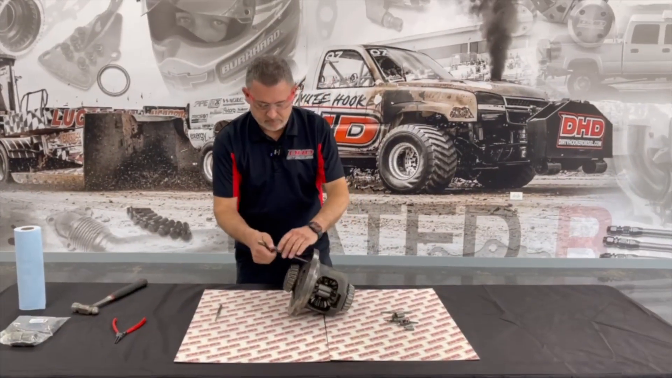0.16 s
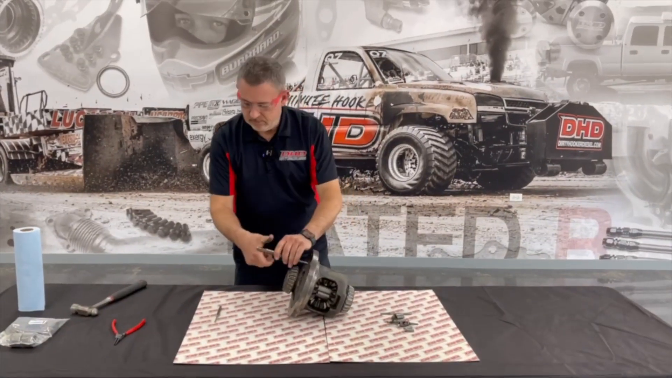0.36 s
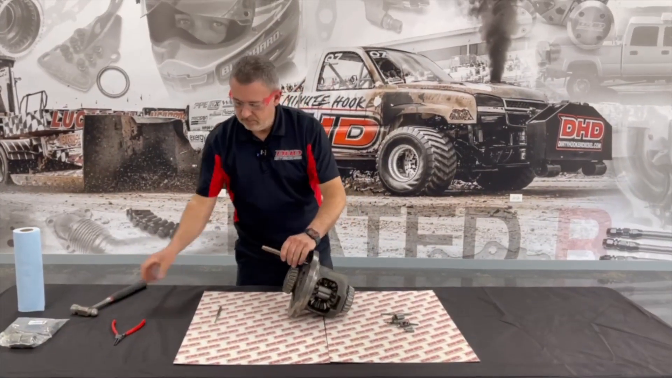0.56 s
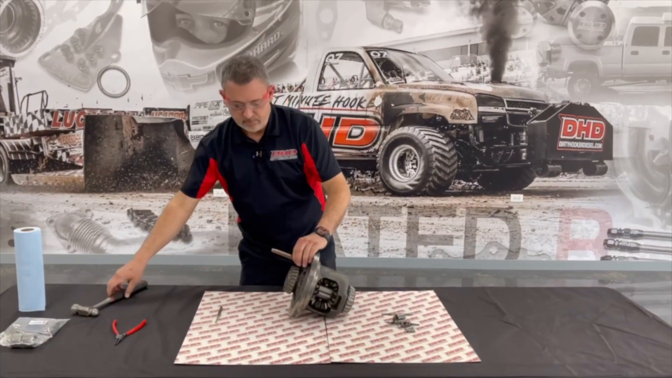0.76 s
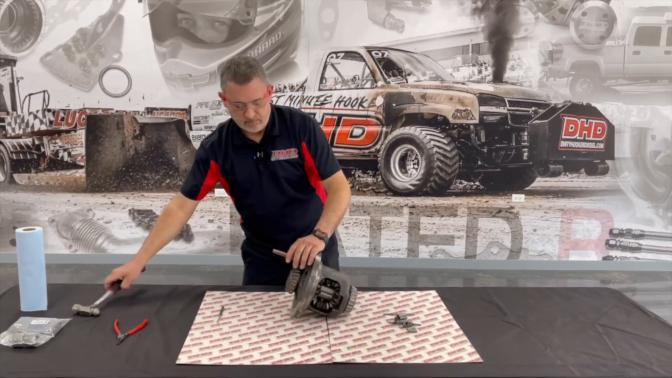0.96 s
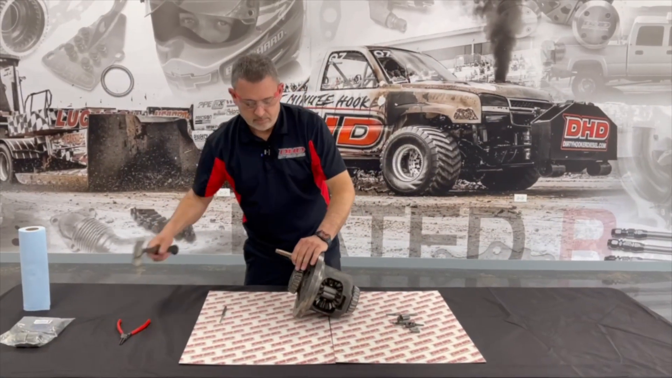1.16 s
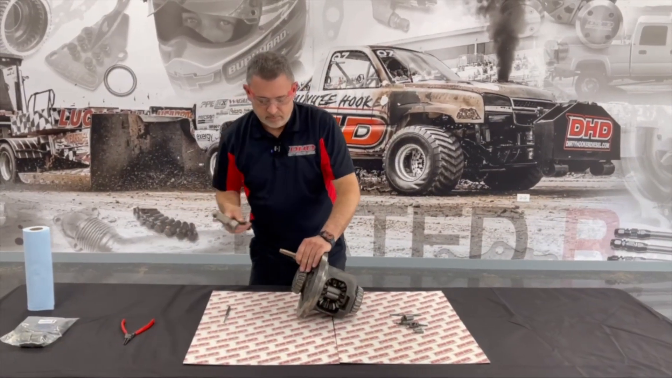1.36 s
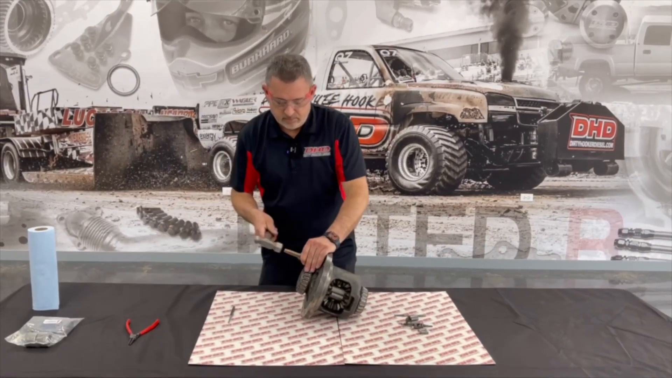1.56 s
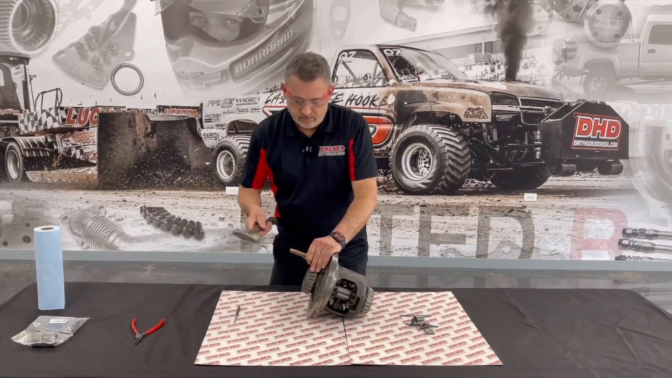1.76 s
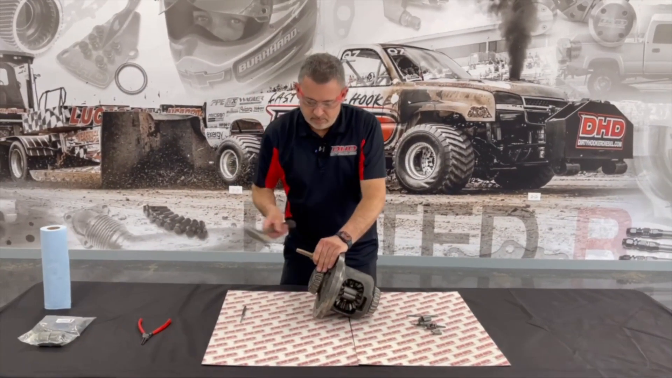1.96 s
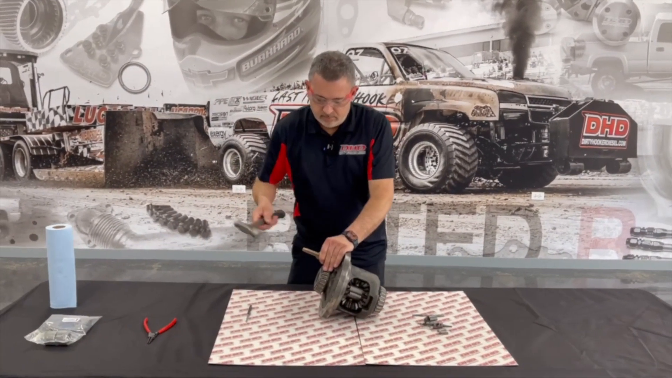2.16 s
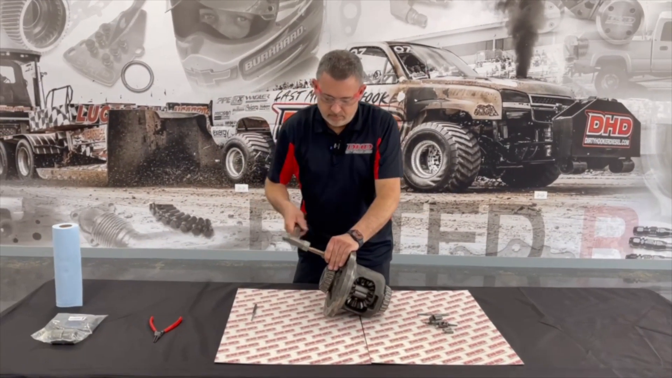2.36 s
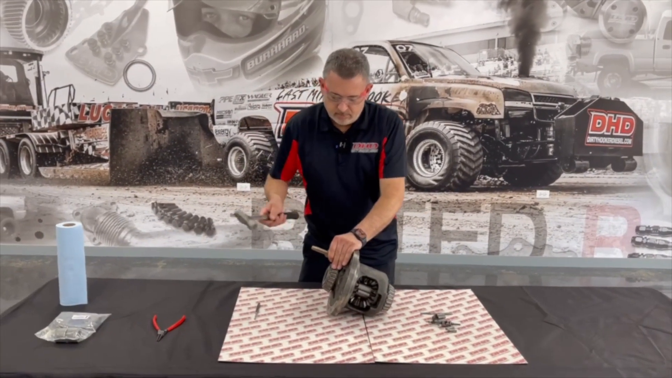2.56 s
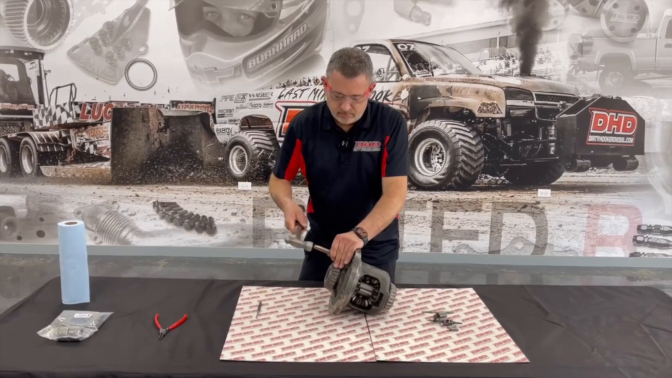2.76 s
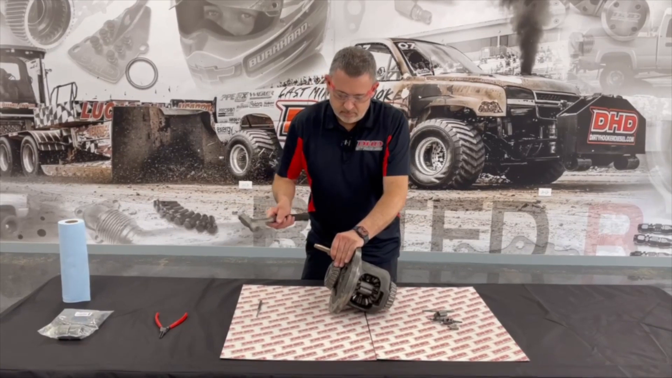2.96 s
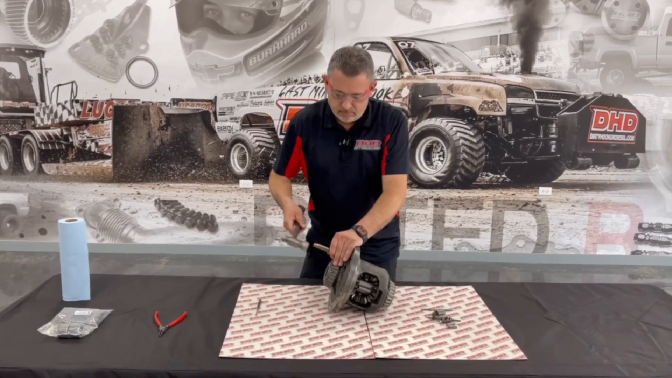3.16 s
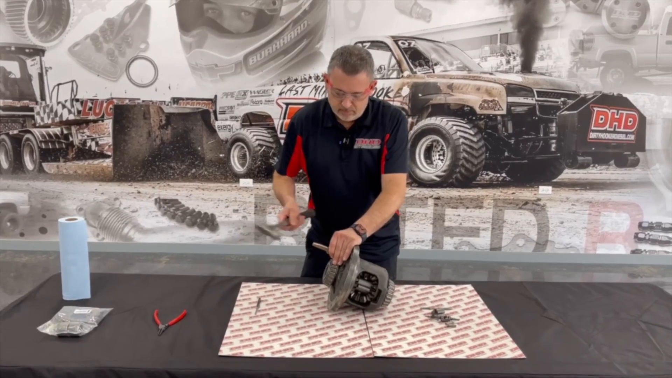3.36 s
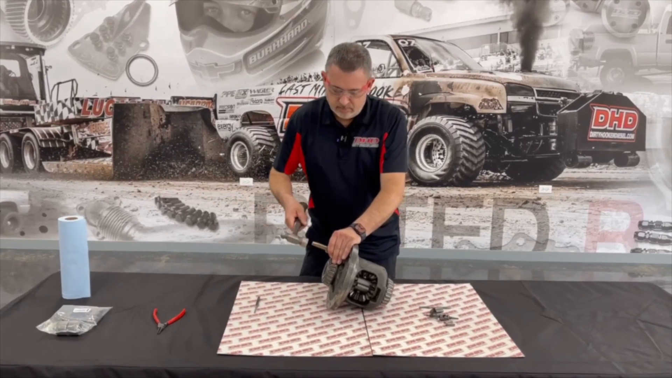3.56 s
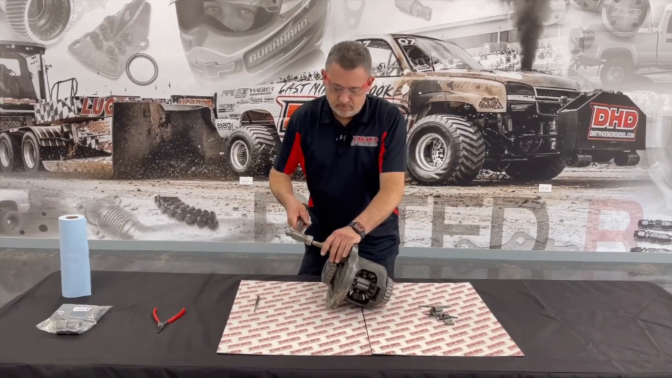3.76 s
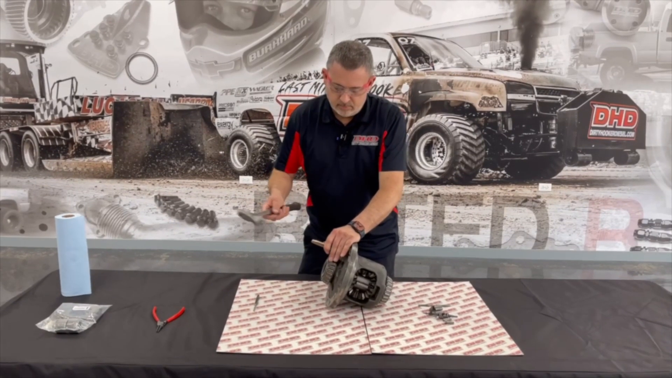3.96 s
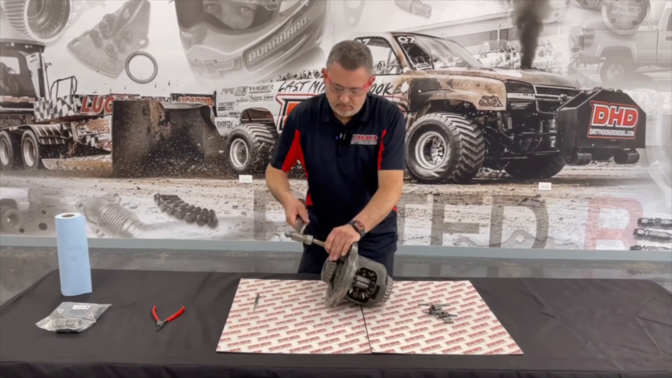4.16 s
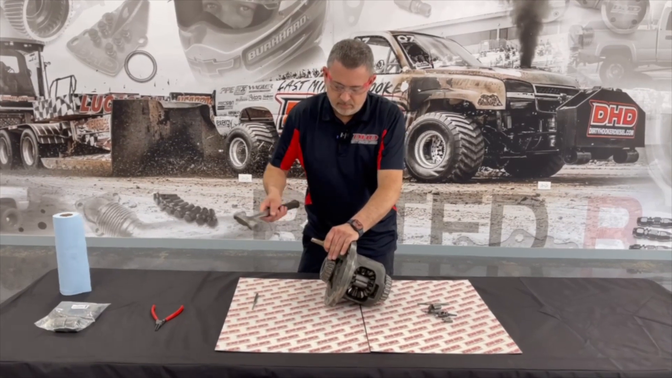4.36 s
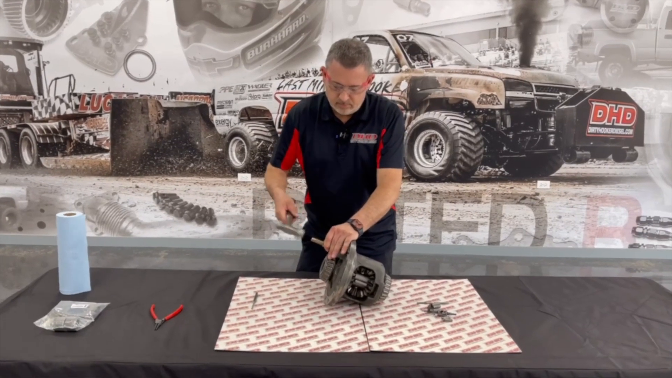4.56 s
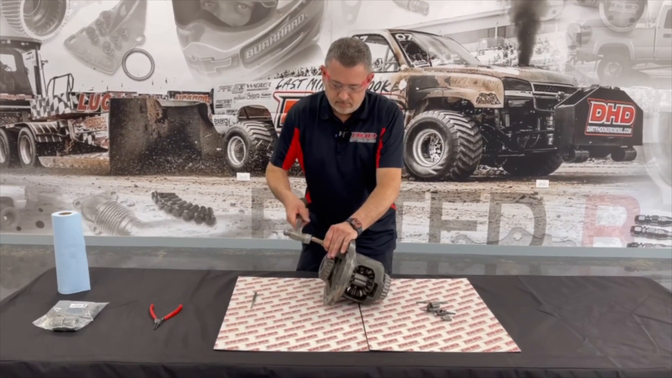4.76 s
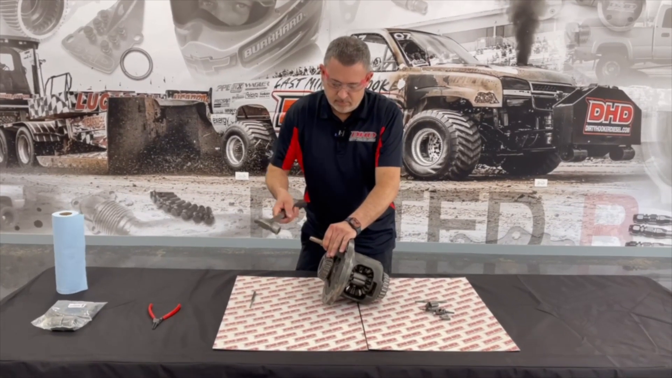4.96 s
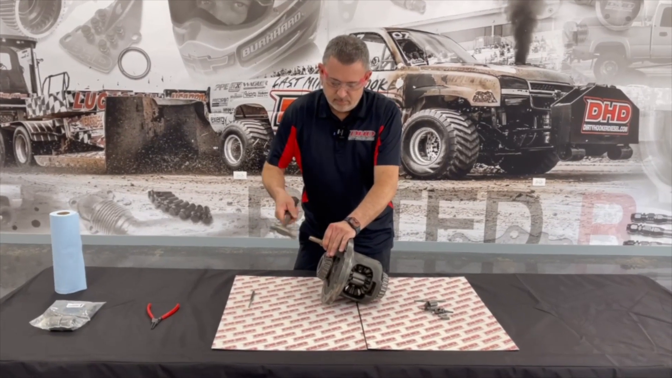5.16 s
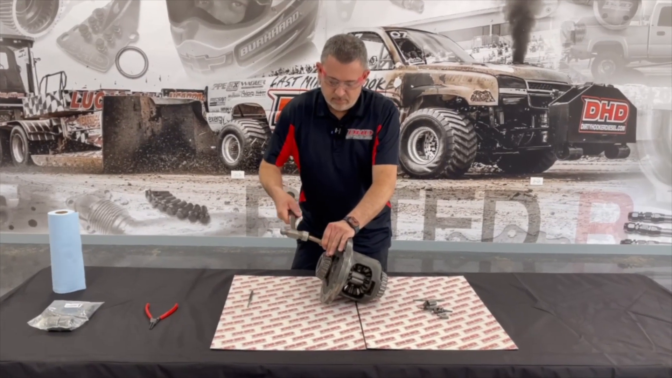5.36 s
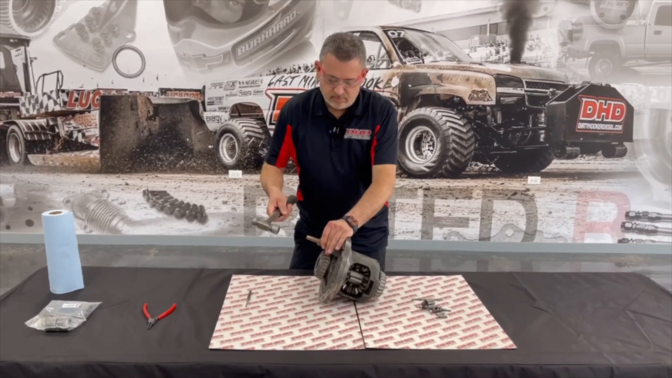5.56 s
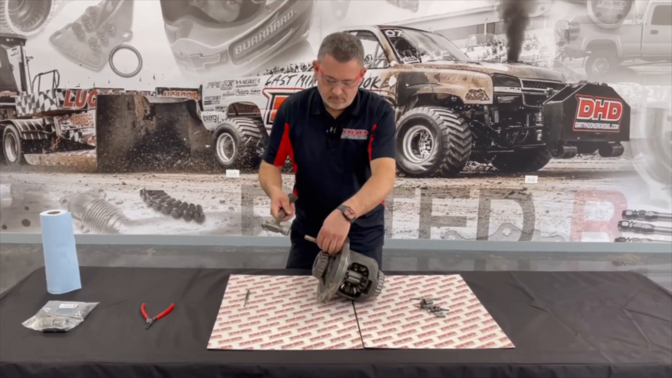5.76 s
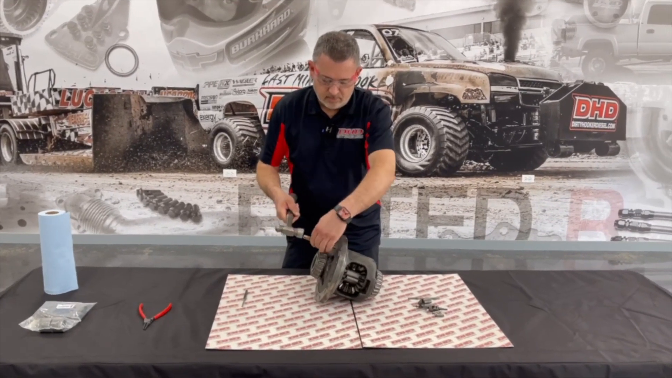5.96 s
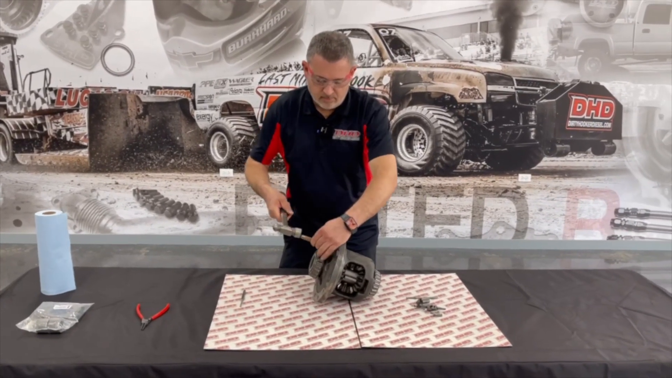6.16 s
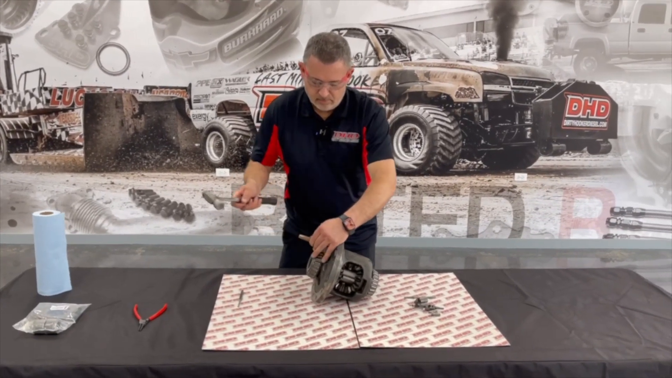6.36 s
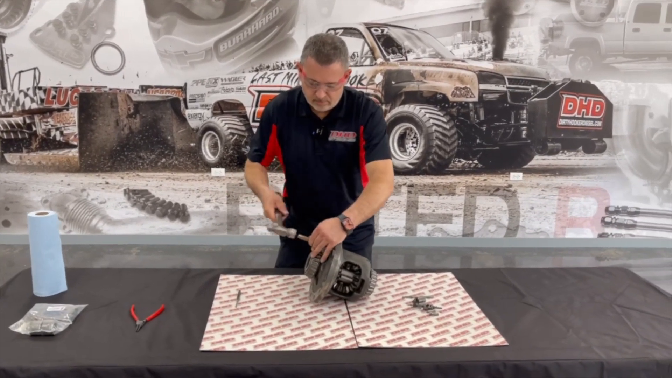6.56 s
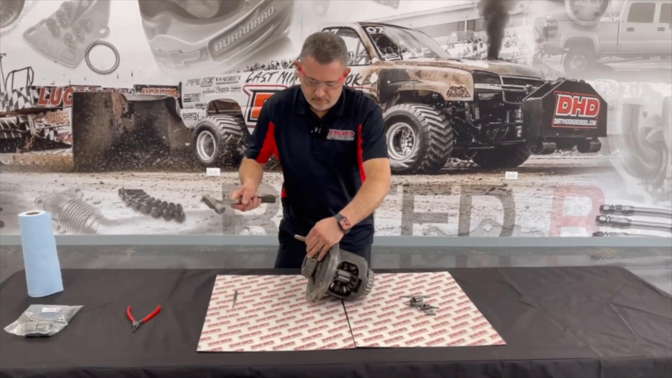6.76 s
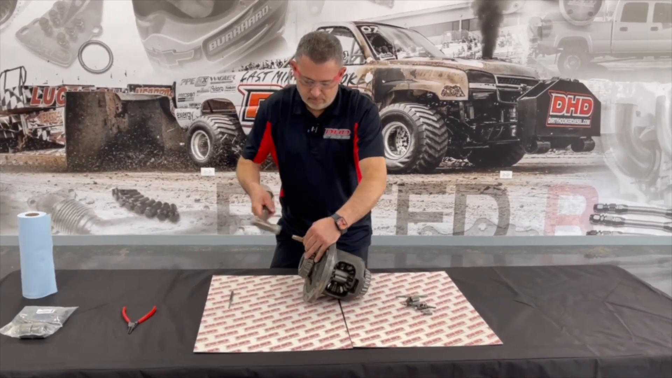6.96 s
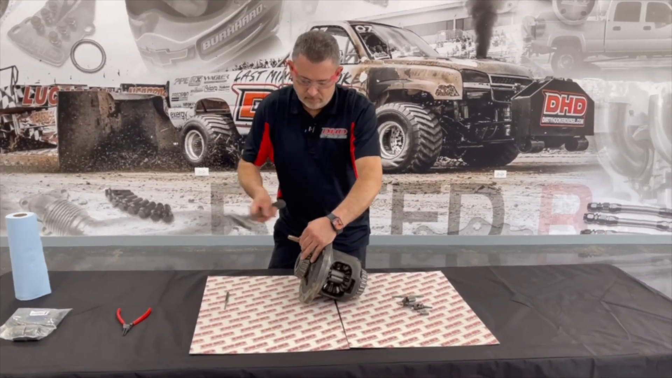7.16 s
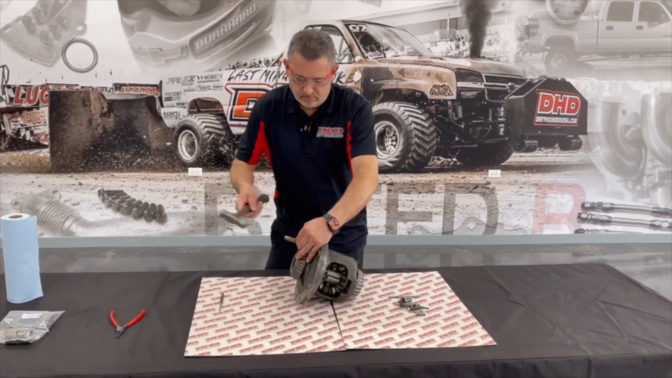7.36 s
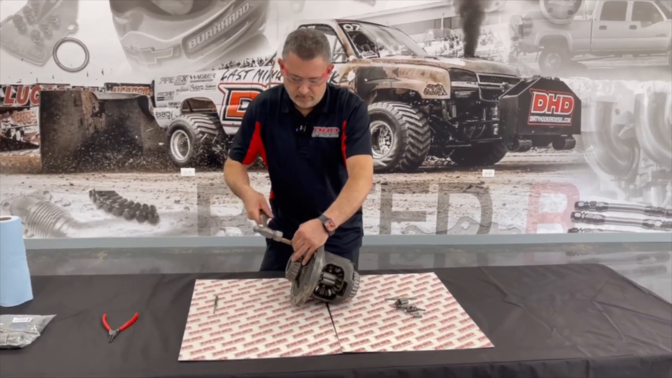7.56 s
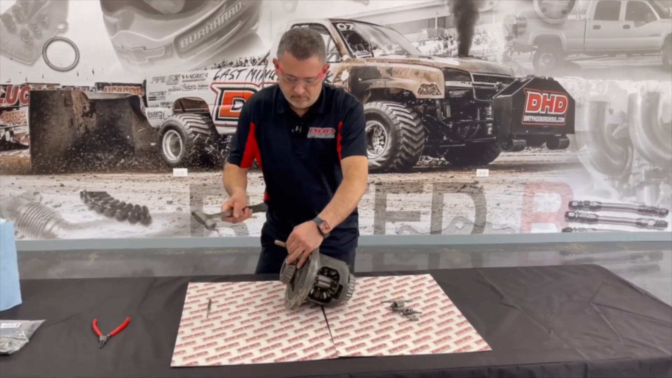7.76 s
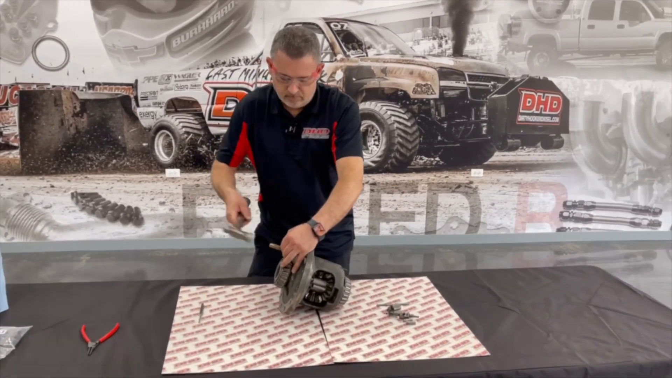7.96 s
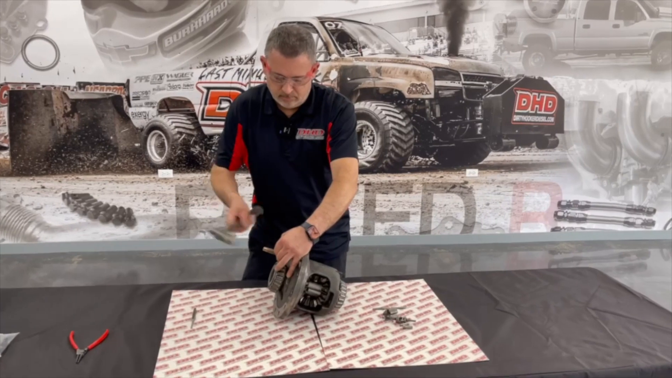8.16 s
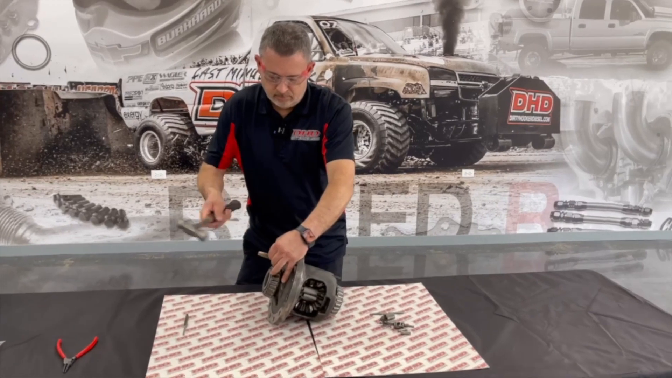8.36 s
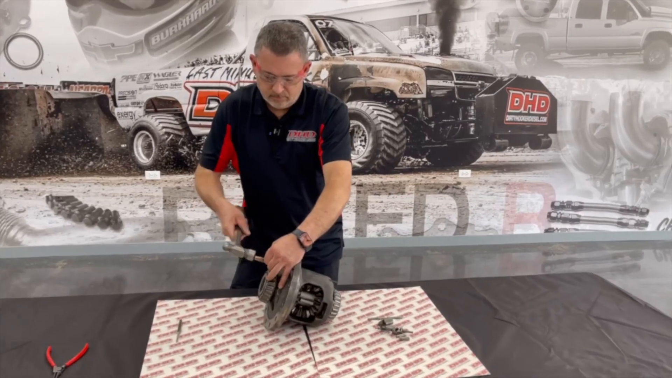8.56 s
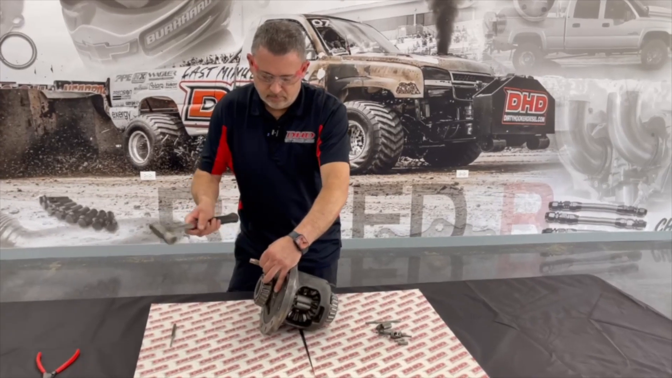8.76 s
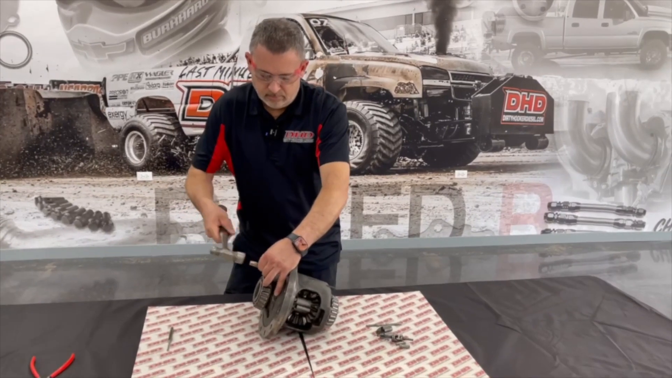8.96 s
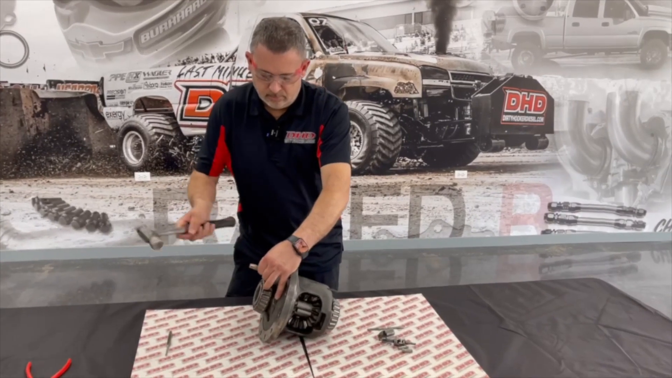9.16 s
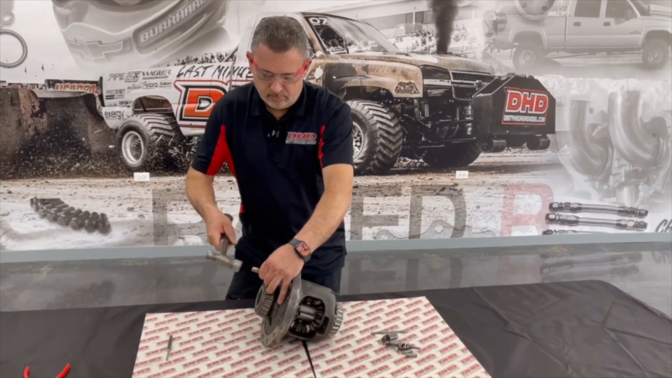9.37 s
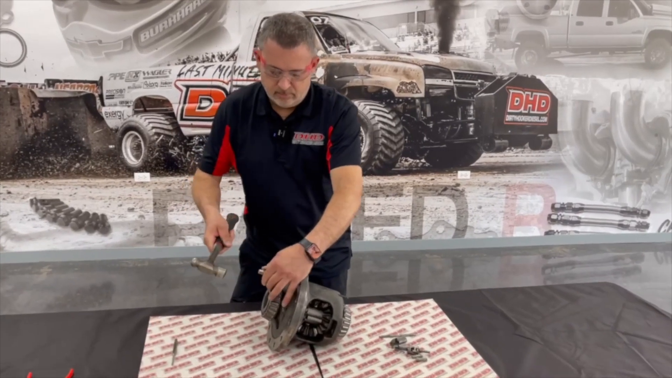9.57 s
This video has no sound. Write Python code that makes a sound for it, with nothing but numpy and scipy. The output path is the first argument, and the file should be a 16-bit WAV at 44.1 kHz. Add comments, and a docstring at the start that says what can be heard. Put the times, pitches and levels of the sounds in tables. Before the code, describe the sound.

Faint gritty scrapes and a light metallic tick open the scene, followed by dull thumps and a cloth rustle. A hammer then drives a punch into a heavy cast housing: one softer tap, then hard, bright cracks in regular runs, with brief gaps filled by tiny clinks and the room's decay. The last blow is strongest. Workshop reverberation, low quiet air, a moderately distant microphone.

```python
"""A hammer drives a steel punch into a heavy cast housing on a padded bench, in three runs of blows.
Each blow layers a chattering crack, dying steel modes and dense noise rattle over the modal boom of the bench.
Around the blows the punch scrapes (resonant grit) and clinks (ticks and modes) in its hole; the hammer
leaves the bench with dull noise thumps and sleeves rustle as filtered noise.
A hard-walled shop answers with a spread-out echo and a diffuse tail, over quiet air."""
import sys
import numpy as np
from scipy import signal
from scipy.fft import rfft, irfft, next_fast_len
from scipy.io import wavfile

SR = 44100
rng = np.random.default_rng(int(sys.argv[2]) if len(sys.argv) > 2 else 0)


def digitize_waveform(pressure):
    """Quantize a signal to 16-bit integers and store it at the path in sys.argv[1].

    Rows of a 2-D input are taken as channels; values are limited to [-1, 1].
    """
    field = np.atleast_2d(pressure).T
    bounded = np.clip(field, -1, 1)
    quanta = np.round(bounded * 32767).astype(np.int16)
    wavfile.write(sys.argv[1], SR, quanta)


def gain_from_db(level_db):
    """Turn a decibel level (scalar or array-like) into a linear amplitude factor."""
    decades = np.asarray(level_db, float) / 20
    return 10 ** decades


N = 424706  # length in samples

# hammer blows: [t/s, steel peak level/dB, bench boom peak level/dB,
#                seat colour in the middle level/dB, seat colour in the treble level/dB]
BLOWS = [(1.6139, -16, -47, -6.5, -11.5), (2.0188, -5.5, -27, -6, -2), (2.392, -3.5, -24.5, -7, -1),
         (2.7243, -4, -24.5, -5.5, -1), (3.0637, -2, -23, -6.5, 2), (3.4279, -5, -24.5, -5, -7.5),
         (4.1509, -2, -24.5, -1.5, -0.5), (4.4958, -4.5, -23.5, -2.5, -2.5),
         (4.7927, -5.5, -25.5, -2.5, -4), (5.07, -6, -24, -3.5, -5.5), (5.3175, -6.5, -24.5, -4.5, -9.5),
         (6.5214, -4.5, -23, -8, -4.5), (6.8859, -2.5, -23.5, -4.5, -1), (7.22, -4, -24, -4, -5),
         (7.5398, -4.5, -23, -6.5, -7.5), (7.8685, -4, -25.5, -5.5, -4), (8.2139, -4, -22, -2, -6),
         (8.547, -3, -26.5, -3.5, -3.5), (8.8971, -1, -24.5, -4.5, -3.5), (9.2786, 1.5, -22, -6.5, -7.5)]
# corners of the seat colour, uncoloured below the first, then middle and treble: [f/Hz]
SEAT_CORNERS = [2040, 6200, 11580]
# modes of housing and punch: [f/Hz, level/dB, t60/s]
STEEL_MODES = [(410, -16, .05), (500, -13, .04), (1650, -10, .055), (1720, -11, .055), (2010, -11, .04),
               (2170, -11, .04), (2620, -8, .035), (2800, -8, .035), (4350, -8, .035), (4780, -8, .045),
               (5770, -16, .05), (6450, -6, .02), (8000, -8, .018), (10200, 0, .013), (11200, -3, .012),
               (12700, -9, .012), (15300, -5, .012), (1685, -36, .65), (1735, -35, .75), (2410, -40, .6),
               (2435, -38, .7), (3880, -29, .3), (5980, -24, .3), (7145, -26, .28), (7360, -23, .16),
               (8440, -28, .2), (10500, -28, .22), (12195, -33, .22)]
# dense rattle between the steel modes, its colour: [f/Hz, level/dB]
RATTLE_COLOUR = [(200, -6), (500, -3), (1100, -8), (2500, 0), (5000, 3), (7600, 2), (9200, -2), (10500, 1),
                 (12000, -3.5), (14000, -11.5), (16000, -15.5)]
# how long the rattle rings: [f/Hz, t60/s]
RATTLE_DECAY = [(300, 0.15), (2000, 0.09), (5000, 0.093), (10000, 0.023), (15000, 0.077)]
# modes of the bench top: [f/Hz, level/dB, t60/s]
BENCH_MODES = [(54, -21.5, 0.36), (95.6, -15.5, .45), (138.2, -8, .62), (141.2, -4.5, .5), (152.5, -24, .9),
               (158.5, -9.5, .28), (255.4, -22, 0.27), (267, -23, .4), (282.2, -9.5, 0.26),
               (306.4, -25.5, 0.89), (328.5, -17.5, 0.54), (374, -21.5, 0.49), (414, -17, .2),
               (484, -14, 0.24), (512, -30.5, 0.96), (565, -26, 0.5)]
# the punch knocking in its hole: [t/s, peak level/dB, bench boom peak level/dB,
#                                  centre of the tick f/Hz, looseness from 0 seated to 1 loose]
CLINKS = [(.524, -50, -74.5, 5000, .8), (.538, -50, -80, 6200, 0.93), (.6957, -21, -61, 7350, 1),
          (.707, -36.5, -56.5, 4300, .95), (1.0736, -51.5, -55, 6250, 0.25), (1.2414, -60, -73, 2570, 0.49),
          (3.6519, -20, -53, 5400, 0.71), (3.7335, -41, -52.5, 5500, .3), (4.353, -47, -54.5, 4970, 0.094),
          (4.6963, -41.5, -56, 4440, 0.19), (5.9946, -19, -46, 4280, 0.13),
          (6.0485, -19, -39.5, 4450, 0.13), (6.0668, -30, -49, 4200, .1), (6.081, -38, -69, 4030, .1),
          (6.089, -45, -79, 4130, .1), (6.3676, -56.5, -65, 2810, 0.32), (7.4204, -42, -59, 4200, .1),
          (9.6034, -45, -72, 5610, .3)]
# modes of the punch: [f/Hz, seated level/dB, loose level/dB, t60/s]
PUNCH_MODES = [(2660, -16, -4, .03), (4200, -1, -24, .016), (5510, -36, -6, .065), (6900, -5, -10, .012),
               (8040, -20, -5, .035), (10100, -4, -12, .012), (12470, -6, -5, .025)]
# hammer leaving the padded bench: [t/s, dull knock level/dB, edge against the knock level/dB]
THUMPS = [(0.866, -52.5, 4.5), (1.025, -44.5, -12)]
# sleeve and hand rustles: [t/s, length/s, rms before the fades level/dB]
RUSTLES = [(.905, 0.012, -70), (1.01, 0.032, -75), (1.245, 0.054, -83), (1.352, 0.05, -76),
           (1.465, 0.032, -81)]
# strokes of the punch sliding in the hole: [t/s, length/s, level swelled to/dB,
#                                            gap resonance from f/Hz, gap resonance to f/Hz]
STROKES = [(.492, 0.061, -54, 2700, 3250), (.586, 0.052, -52, 3750, 4020), (.641, 0.04, -51, 4000, 4100),
           (.672, .024, -48, 2660, 2570), (5.908, 0.033, -69.5, 1880, 1900), (6.3, .028, -67.5, 1880, 1910)]
# decay of the shop's tail: [f/Hz, t60/s]
ROOM_DECAY = [(100, 0.61), (300, 1), (1000, 0.83), (3000, 0.74), (6000, 0.68), (10000, 0.5), (15000, 0.38)]
# colour of the shop's tail: [f/Hz, level/dB]
ROOM_COLOUR = [(90, 10), (140, 2.5), (220, 10.5), (400, 4), (1000, -0.5), (3000, -8.5), (7000, -3.5),
               (10000, -8), (15000, -8.5)]
# spectrum of the quiet air, shape only: [f/Hz, level/dB]
AIR_COLOUR = [(18, -31), (30, -13), (42, -16), (58, -9.5), (77, -14.5), (129, -7), (251, -16.5), (822, -20),
              (1450, -32), (2500, -26.5), (2900, -28), (11000, -38.5), (14300, -71.5), (22000, -120)]
# top end of the microphone: [f/Hz, level/dB]
MICROPHONE_TOP = [(15500, 0.5), (15900, -5), (17000, -18.5)]

AIR_DB = -74.5  # rms
RATTLE_DB, CRACK_DB = -4, 2  # against the steel modes, before the seat colours them
CRACK_T60_S = 0.0085  # the first contact of the faces
CHATTERS, CHATTER_S, CHATTER_DB = 7, .016, -6  # extra contacts, their time span, level at its start
BENCH_RISE_S = .011
RING_DB = -5  # ring of the punch against the tick
GRIT_DB = 4  # broad hiss against the squeak of the gap
STROKE_SWELL_DB, STROKE_EDGE_S = -17, .006  # a stroke starts this much softer than it ends; fades
ROOM_DB = -15
ECHO_S, ECHO_DB, ECHO_T60_S = 0.04, -27, 0.06  # the far wall, cluttered, so its answer is spread out
MODES_FAR_DB, RATTLE_FAR_DB, SHOCK_FAR_DB, BENCH_FAR_DB = -3, -5.5, 18, -22  # sent to the walls
MICROPHONE_LOW_HZ = 48.9
CEILING = 1  # where the input stage flattens the peaks


def read(points, hz):
    """Reads a table on a log-frequency axis."""
    f, value = np.transpose(points)
    return np.interp(np.log(hz + 1), np.log(f + 1), value)


def peaked(x):
    """Scales to peak 1."""
    return x / abs(x).max()


def evened(x):
    """Scales to rms 1."""
    return x / np.sqrt(np.mean(x ** 2))


def add(mix, s, sound):
    """Lays a sound into every row of the mix at s seconds."""
    part = mix[:, round(s * SR):][:, :sound.shape[-1]]
    part += sound[..., :part.shape[-1]]


def coloured(x, points):
    """Filters by an (f/Hz, level/dB) table, with silence behind so that nothing wraps round."""
    size = next_fast_len(len(x) + 2048)
    gain = gain_from_db(read(points, np.fft.rfftfreq(size, 1 / SR)))
    return irfft(rfft(x, size) * gain, size)[:len(x)]


def dying(colour, t60, seconds, size=128):
    """Noise whose every band dies at its own speed."""
    samples = round(seconds * SR)
    frame = dict(nperseg=size, noverlap=size * 3 // 4)
    hz, t, bands = signal.stft(rng.standard_normal(samples), SR, **frame)
    fall_db = 60 * t / np.maximum(read(t60, hz), .005)[:, None]
    bands = bands * gain_from_db(read(colour, hz)[:, None] - fall_db)
    return signal.istft(bands, SR, **frame)[1][:samples]


def ring(modes, seconds, scatter_db, scatter_turns):
    """Dying sines; no two strikes wake the modes quite alike."""
    hz, db, t60 = np.transpose(modes)[:, :, None]
    level_luck, phase_luck = rng.standard_normal((2, len(modes), 1))
    t = np.arange(round(seconds * SR)) / SR
    envelope = gain_from_db(db + scatter_db * level_luck - 60 * t / t60)
    return (envelope * np.sin(2 * np.pi * (hz * t + scatter_turns * phase_luck))).sum(0)


def rise(x, seconds):
    """Soft exponential start with this time constant."""
    return x * -np.expm1(-np.arange(len(x)) / (seconds * SR))


def heard(sound, far_db):
    """Two rows: what reaches the microphone and what reaches the walls."""
    return sound * gain_from_db([[0], [far_db]])


def quiet_air():
    """Steady noise shaped like the air of the shop."""
    return gain_from_db(AIR_DB) * evened(coloured(rng.standard_normal(N), AIR_COLOUR))


def punch(loose, seconds):
    """Seated, the punch clacks with the housing; loose, it rings on its own modes."""
    hz, seated_db, loose_db, t60 = np.transpose(PUNCH_MODES)
    db = seated_db + np.clip(loose, 0, 1) * (loose_db - seated_db)
    return peaked(ring(np.transpose([hz, db, t60]), seconds, scatter_db=1.5, scatter_turns=1))


def scrape(seconds, top_db, from_hz, to_hz):
    """Gritty friction through the moving gap resonance, its overtone and the punch itself."""
    t = np.arange(0, seconds, 1 / SR)
    hz = from_hz + (to_hz - from_hz) * t / seconds
    fades = np.clip(np.minimum(t, seconds - t) / STROKE_EDGE_S, 0, 1)
    level = gain_from_db(top_db + STROKE_SWELL_DB * (1 - t / seconds)) * fades
    # uneven grains: noise with a random lift on every sample
    grit = rng.standard_normal(len(t)) * gain_from_db(3.3 * np.minimum(rng.exponential(1, len(t)), 4))
    hiss = coloured(grit, [(1000, -23), (3000, -9.0), (7000, 2.0), (15000, -15.0)])
    friction = gain_from_db(GRIT_DB) * evened(hiss)
    for factor, width_hz, level_db in [(1, 160, 9.3), (1.75, 298, 2.7)]:
        # shift the grit down by the gliding pitch, smooth it, shift it back up
        turn = np.exp(2j * np.pi * np.cumsum(hz * factor) / SR)
        radius = np.exp(-np.pi * width_hz / SR)
        squeak = (turn * signal.lfilter([1], [1, -radius], grit / turn)).real
        friction += gain_from_db(level_db) * evened(squeak)
    pushed = signal.fftconvolve(grit * level, punch(0.91, .03))[:len(t)]
    return level * evened(friction) + gain_from_db(-35.0) * pushed


def bench(db):
    """The bench top is pushed down, swings up over a few cycles and booms."""
    boom = rise(ring(BENCH_MODES, .9, scatter_db=1.2, scatter_turns=.03), BENCH_RISE_S)
    return heard(-gain_from_db(db) * peaked(boom), BENCH_FAR_DB)


def clink(peak_db, boom_db, hz, loose):
    """A short tick and the ring of the punch; the softer the knock, the less treble."""
    tick = peaked(dying([(500, 0)], [(500, 0.043), (16000, 0.019)], .2, size=64))
    knock = tick + gain_from_db(RING_DB) * punch(loose, .2)
    knock = coloured(knock, [(hz / 8, -7), (hz / 2, -7), (hz, 0), (hz * 3, 3.5 + 0.77 * peak_db)])
    out = bench(boom_db)
    add(out, 0, gain_from_db(peak_db) * peaked(rise(knock, 0.00012)))
    return out


def thump(dull_db, edge_db):
    """A dull noise knock on the pad with a brighter edge, stronger or weaker than the knock."""
    dull_colour = [(45, -14), (90, 3.0), (400, 0), (900, -21.0), (3000, -60.5)]
    dull = peaked(dying(dull_colour, [(100, 0.16), (1000, 0.084)], .6, size=512))
    edge_colour = [(500, 3), (4000, -14), (9000, -24)]
    edge = peaked(dying(edge_colour, [(500, 0.074), (9000, 0.037)], .6))
    return gain_from_db(dull_db) * rise(dull + gain_from_db(edge_db) * edge, 0.00067)


def rustle(seconds, db):
    """A soft swish of cloth: filtered noise, faded at both ends."""
    noise = rng.standard_normal(round(seconds * SR))
    swish = coloured(noise, [(1200, -27.0), (2700, 18), (6000, 16.5), (12000, -11)])
    return gain_from_db(db) * evened(swish) * signal.windows.tukey(len(swish), .6)


def chatter(x):
    """The punch jumps in its seat: a few more contacts, weaker the later they come, follow the first."""
    when, sign = rng.random((2, CHATTERS))
    contacts = signal.unit_impulse(round(CHATTER_S * SR) + 1)
    places = 1 + (when * (len(contacts) - 2)).astype(int)
    contacts[places] = gain_from_db(CHATTER_DB - 9.0 * when) * np.sign(sign - .5)
    return signal.fftconvolve(x, contacts)[:len(x)]


def crack():
    """Very short noise as the faces meet, repeated by the chatter."""
    contact = peaked(dying(RATTLE_COLOUR, [(1000, CRACK_T60_S)], .9, size=64))
    return chatter(rise(contact, 0.00013))


def blow(peak_db, boom_db, *seat_db):
    """Crack, steel modes and dense rattle, coloured by the seat of the punch, over the boom."""
    modes = peaked(ring(STEEL_MODES, .9, scatter_db=3, scatter_turns=1))
    noise = gain_from_db(RATTLE_DB) * peaked(dying(RATTLE_COLOUR, RATTLE_DECAY, .9))
    noise += gain_from_db(CRACK_DB) * crack()
    shock = peaked(coloured(signal.unit_impulse(len(modes), 40), RATTLE_COLOUR))
    seat_colour = list(zip(SEAT_CORNERS, (0, *seat_db)))
    modes, noise, shock = (rise(coloured(x, seat_colour), 0.0001) for x in (modes, noise, shock))
    steel = heard(modes, MODES_FAR_DB) + heard(noise, RATTLE_FAR_DB)
    steel[1] += gain_from_db(SHOCK_FAR_DB) * shock  # the bare click goes to the walls only
    return gain_from_db(peak_db) * steel / abs(steel[0]).max() + bench(boom_db)


def shop(x):
    """One spread-out echo within a diffuse tail that builds up and dies band by band."""
    tail = rise(dying(ROOM_COLOUR, ROOM_DECAY, 1.2, size=512), 0.003)
    taps = gain_from_db(ROOM_DB) * tail / np.linalg.norm(tail)
    echo = rise(dying([(500, 0)], [(500, ECHO_T60_S)], .1, size=64), 0.00086)
    add(taps[None], ECHO_S, gain_from_db(ECHO_DB) * echo / np.linalg.norm(echo))
    return signal.fftconvolve(x, taps)[:N]


def scene():
    """All sources in the shop over its quiet air."""
    mix = np.zeros((2, N))
    sources = [(STROKES, scrape), (CLINKS, clink), (THUMPS, thump), (RUSTLES, rustle), (BLOWS, blow)]
    for rows, source in sources:
        for s, *how in rows:
            add(mix, s, source(*how))
    near, far = mix
    return (near + shop(far) + quiet_air())[None]


def band_limit(x):
    """A steep low-pass at the top of the band."""
    return signal.sosfilt(signal.butter(12, 17130, fs=SR, output="sos"), x)


def record(dry):
    """The microphone trims both ends and the input stage rounds the peaks."""
    bass_cut = signal.butter(4, MICROPHONE_LOW_HZ, "high", fs=SR, output="sos")
    trimmed = coloured(signal.sosfilt(bass_cut, dry[0]), MICROPHONE_TOP)
    finished = CEILING * np.tanh(trimmed / CEILING)[None]
    return band_limit(finished)


dry = scene()
out = record(dry)
digitize_waveform(out)
```